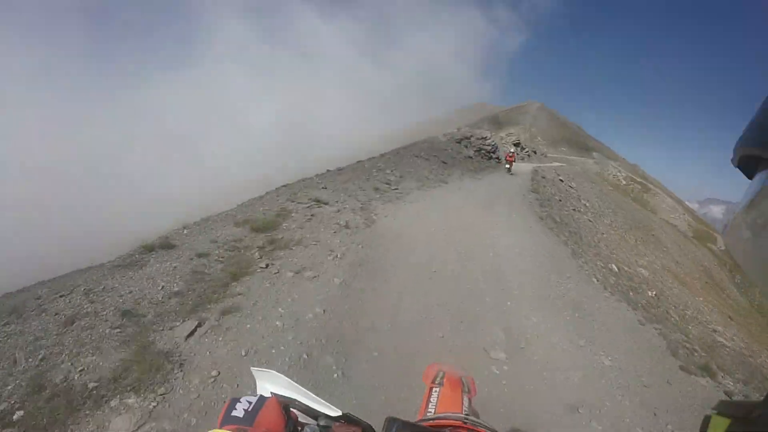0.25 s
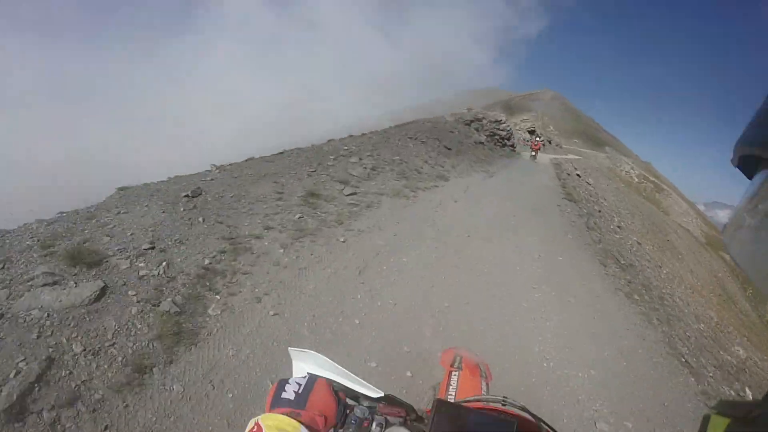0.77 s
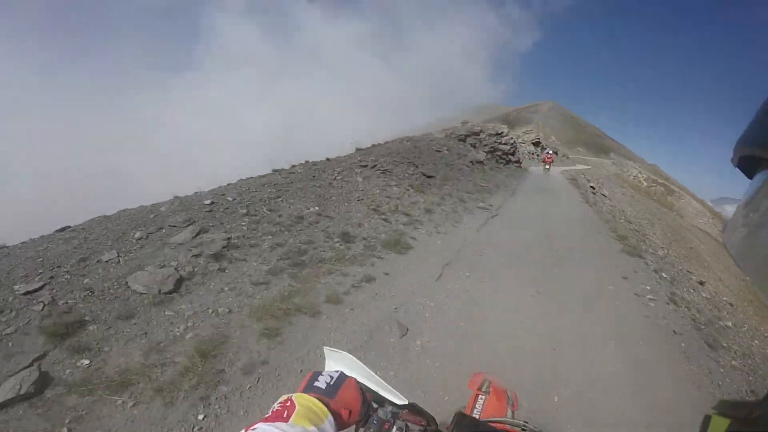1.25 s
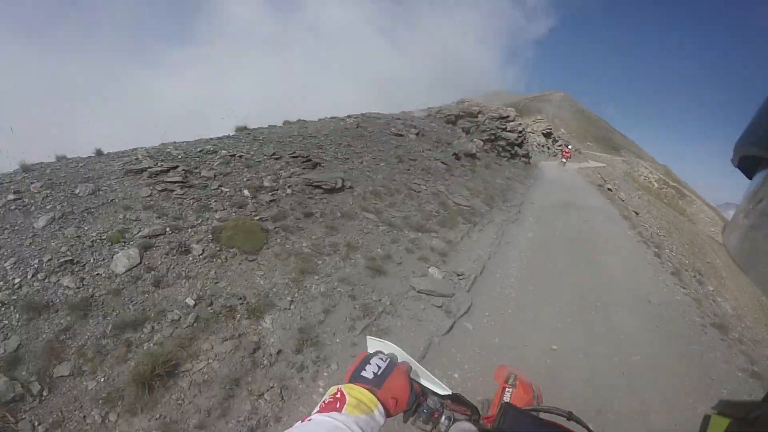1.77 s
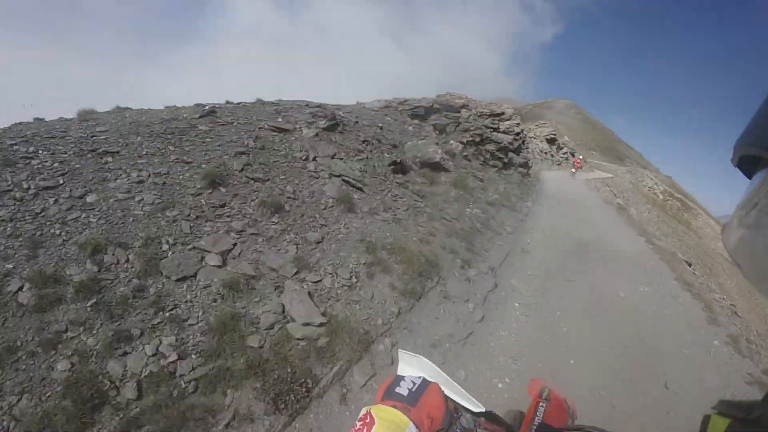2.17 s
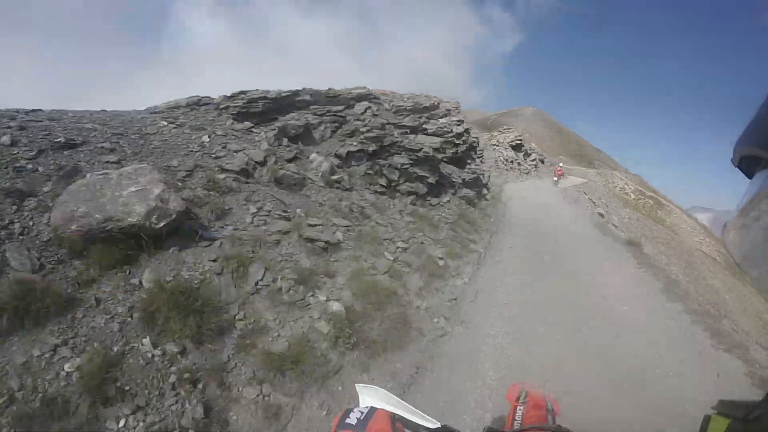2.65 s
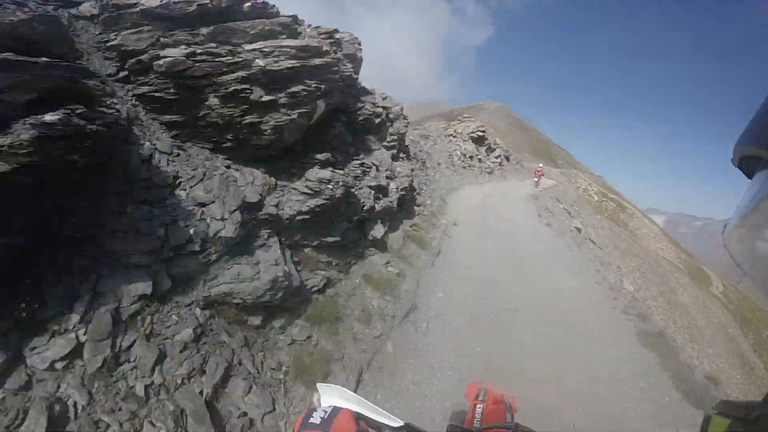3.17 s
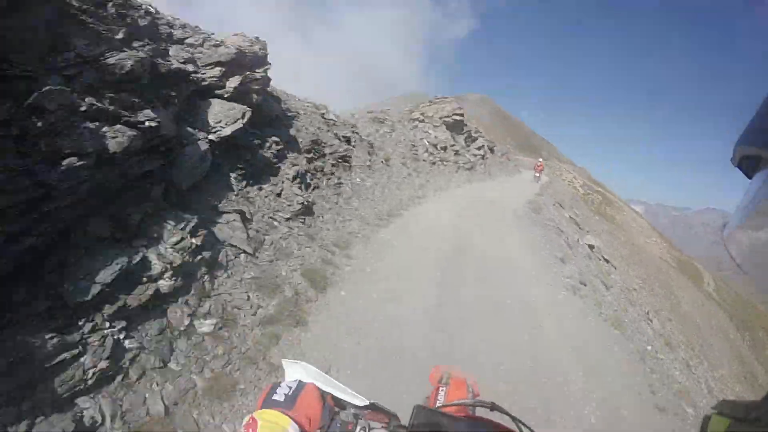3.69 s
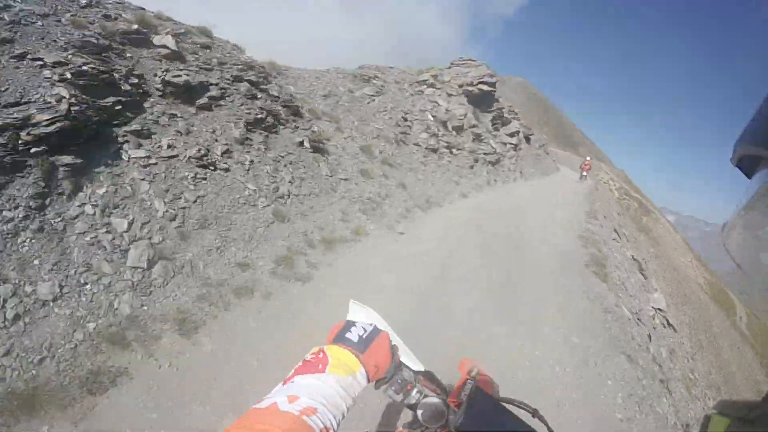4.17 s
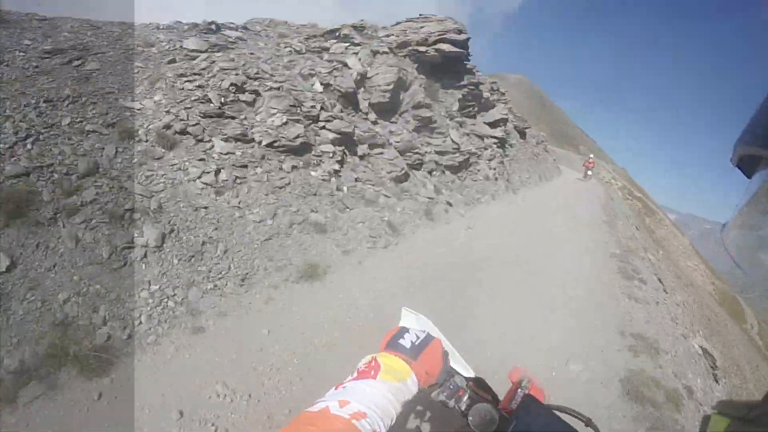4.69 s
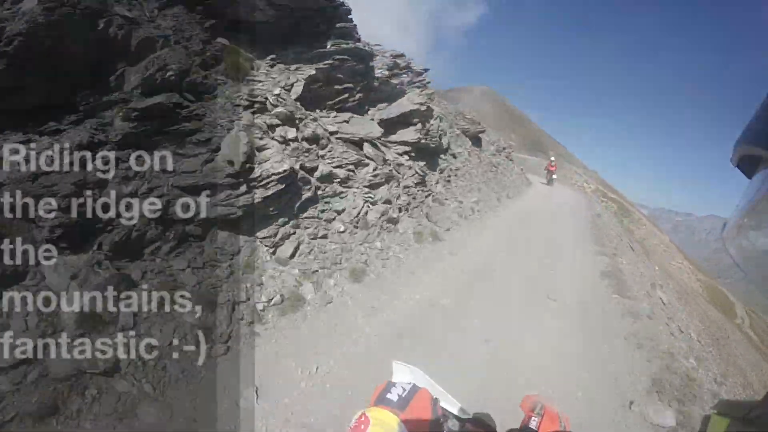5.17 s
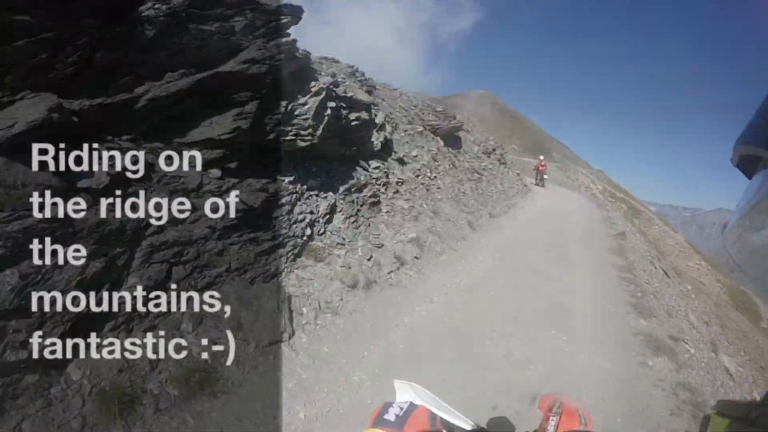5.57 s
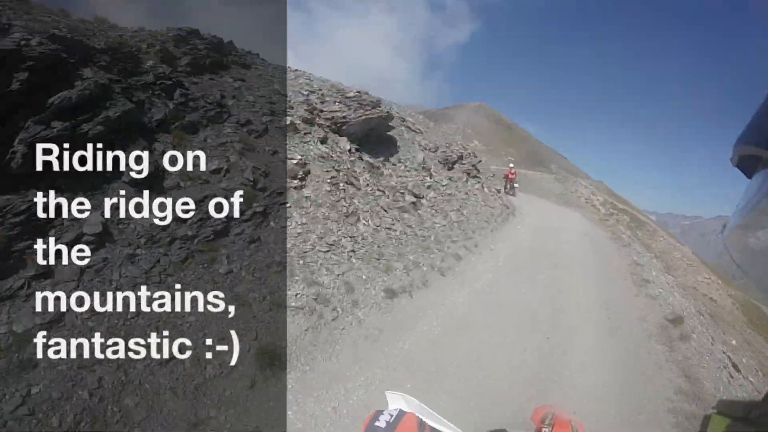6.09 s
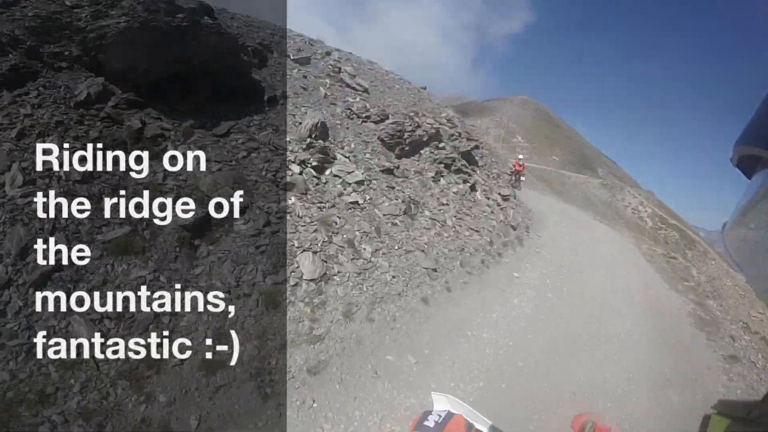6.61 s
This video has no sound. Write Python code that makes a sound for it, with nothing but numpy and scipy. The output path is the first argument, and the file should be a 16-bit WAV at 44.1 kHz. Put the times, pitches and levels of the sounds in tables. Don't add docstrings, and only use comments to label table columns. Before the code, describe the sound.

A single-cylinder dirt bike blares uphill at full throttle, cuts to a ragged burble, pulls hard again, then settles into soft thudding amid buffeting wind.

```python
import sys
import numpy as np
from scipy import signal
from scipy.fft import rfft, irfft, next_fast_len
from scipy.io import wavfile
from scipy.ndimage import uniform_filter1d, map_coordinates

SR = 44100
rng = np.random.default_rng(int(sys.argv[2]) if len(sys.argv) > 2 else 0)


def ratio(d):
    e = np.asarray(d, float) / 20
    return 10 ** e


def dump_mix(stems):
    frames = np.atleast_2d(stems).T
    limited = np.clip(frames, -1, 1)
    pcm = np.round(limited * 32767).astype(np.int16)
    wavfile.write(sys.argv[1], SR, pcm)


N = 302085

# (t/s, firing rate f/Hz)
SPEED = [(0.0, 39.73), (0.55, 46.74), (0.85, 53.58), (0.95, 50.97), (1.33, 56.7), (1.64, 57.6),
         (2.06, 43.07), (2.12, 42.66), (2.79, 46.65), (3.06, 47.37), (3.31, 49.55), (4.46, 38.21),
         (4.73, 41.51), (4.96, 38.47), (5.86, 37.77), (5.97, 38.94), (6.47, 36.45), (6.85, 37.37)]
# (t/s, throttle opening [0-1], steadiness of burning [0-1])
THROTTLE = [(0, .9, .98), (.8, .9, .98), (1.2, .85, .97), (1.58, .8, .96), (1.68, .1, .3), (2.0, .1, .3),
            (2.1, .5, .85), (2.3, .9, .975), (3.25, .9, .975), (3.45, .8, .9), (3.55, .1, .3),
            (4.3, .05, .3), (4.5, .05, .6), (4.85, .06, .97), (5.9, .06, .97), (6.85, .06, .95)]
# (intake pop t/s, exhaust blast t/s)
PULSE_TIMES_S = (-.0018, .0029)


def unit(x):
    return x / np.sqrt(np.mean(x ** 2) + 1e-20)


def curves(rows):
    s, *cols = np.transpose(rows)
    return [np.interp(np.arange(N) / SR, s, c) for c in cols]


def peak(at_s, rise_s, fall_s):
    return np.interp(np.arange(N) / SR, [at_s - abs(rise_s), at_s, at_s + abs(fall_s)], [0, 1, 0])


def wobble(rate):
    knots = rng.standard_normal(int(N * rate / SR) + 4)
    return map_coordinates(knots, [np.arange(N) * rate / SR])


def filtered(x, response):
    m = next_fast_len(N + SR // 2)
    return irfft(rfft(x, m) * response(np.fft.rfftfreq(m, 1 / SR)), m)[:N]


def low_pass(x, corner_hz, poles):
    return filtered(x, lambda hz: 1 / (1 + 1j * hz / corner_hz) ** poles)


def resonate(x, modes):
    def response(hz):
        total = 0
        for k, (centre, width, db) in enumerate(modes):
            band = 1j * hz * width
            sign = (-1) ** k
            total = total + sign * ratio(db) * band / (centre * centre - hz * hz + band)
        return total / (1 + 1j * hz / 6000) ** 4
    return unit(filtered(x, response))


def rush(spectrum, patchy_db):
    z = signal.stft(rng.standard_normal(N), nperseg=512)[2]
    field = uniform_filter1d(rng.standard_normal(z.shape), 5, 0)
    field = uniform_filter1d(field, 8, 1)
    noise = signal.istft(z * ratio(patchy_db * unit(field)), nperseg=512)[1][:N]
    f, db = np.transpose(spectrum)
    return unit(filtered(noise, lambda hz: ratio(np.interp(np.log(hz + 1), np.log(f), db))))


def crank():
    # (t/s, change of firing rate f/Hz)
    bumps = [(-0.02, 1.4), (0.1, -1.0), (0.2, 0.4), (0.28, -0.7), (0.38, 0.4), (0.48, -0.9), (0.64, 1.1),
             (0.72, -0.4), (0.86, -0.7), (1.04, 0.3), (1.12, 0.6), (1.26, -1.8), (1.34, 0.5), (1.5, -0.4),
             (1.58, -0.5), (1.66, 3.1), (1.9, .45), (2.36, -1.2), (2.6, -0.4), (2.86, -0.4), (3.28, -0.7),
             (3.5, 1.5), (4.66, -0.8), (4.8, -1.0), (4.88, -0.4), (4.98, 0.9), (5.16, 0.5), (5.42, -0.4),
             (5.54, 0.3), (5.72, 0.7), (6.04, -0.2), (6.14, -0.4), (6.22, -0.1), (6.3, -0.4), (6.44, 0.4)]
    half_width_s = .06
    swings_hz = sum(hz * peak(s, half_width_s, half_width_s) for s, hz in bumps)
    return np.cumsum(curves(SPEED)[0] + swings_hz) / SR + .42


def pulses(cycle, jitter_s, scatter_db, arrivals):
    at = np.flatnonzero(np.diff(np.floor(cycle)))
    chance = rng.standard_normal((400, 2 * len(arrivals)))[:len(at)]
    train = np.zeros(N + SR)
    for k, (delay, gain) in enumerate(arrivals):
        where = np.abs(at + SR * (delay + jitter_s * chance[:, 2 * k])).astype(int)
        np.add.at(train, where, gain * ratio(scatter_db * chance[:, 2 * k + 1]))
    return train[:N]


def gate(cycle, sharp, floor):
    return floor + uniform_filter1d(np.exp(-sharp * (cycle % 1)), size=60)


def puffs(cycle):
    return gate(cycle, sharp=8.9, floor=0.16) * rng.standard_normal(N)


def air_box_honk(cycle, firing_hz):
    gulp_s = PULSE_TIMES_S[1] - .0024
    late = np.clip((firing_hz - 47.5) / 4.5, 0, 1)
    gulp = (1 - late) * pulses(cycle, .00006, .7, [(gulp_s, -1)])
    gulp = gulp + late * pulses(cycle, .00006, .7, [(gulp_s + .0075, -1)])
    box = resonate(gulp, [(269.4, 39, 0)])
    return ratio(-2) * resonate(box, [(270, 75, 0)])


def silencer_thud(cycle):
    # (delay t/s, gain [1])
    pipe_echoes = [
        (.001, -1),
        (.0054, -.9),
        (.013, -.5),
    ]
    # (f/Hz, width/Hz, level/dB)
    silencer = [(144, 39, 0.5), (257, 72, 4.5), (81.3, 41, 2.5)]
    thud = resonate(pulses(cycle, .00012, 1, pipe_echoes), silencer)
    click = resonate(pulses(cycle, .00012, 2, [(0, 1)]), [(476, 490, 0)])
    return unit(low_pass(thud + ratio(1.4) * click, 700, 3))


def misfire_burble(cycle):
    # (f/Hz, level/dB per Hz)
    burble_colour = [(47, -50.5), (80, -28.5), (173, -10), (269, -7), (291, -6.5), (390, -11), (509, -12),
                     (846, -16.5), (1800, -43), (2340, -63), (3960, -120)]
    lumps = ratio(1.1 * wobble(35)) * gate(cycle, sharp=0.83, floor=1.0)
    return unit(lumps * rush(burble_colour, patchy_db=.6))


def header_bark(cycle):
    # (f/Hz, width/Hz, level/dB)
    header = [(547, 170, 4.2), (618, 73, 6.5), (676, 90, -9.5), (964, 160, -13)]
    direct, returned = PULSE_TIMES_S
    blasts = pulses(cycle, .00003, 1, [(direct + .0005, .55), (returned, 1), (returned + .007, .3)])
    bark = resonate(blasts, header) + .12 * resonate(puffs(cycle), header)
    return unit(low_pass(bark, 1500, 2))


def tail_pipe(cycle, firing_hz, throttle, steady):
    # (t/s, share [0-1])
    return_share = [(0, .2), (.5, .2), (.7, .35), (1.6, .3), (2.1, .9), (2.3, .7), (3.45, .6), (6.85, .6)]
    # (f/Hz, width/Hz, level/dB)
    tail_modes = [(1690, 243, 3.5), (2075, 1150, -2.5), (2930, 1040, -3.5)]
    # (f/Hz, width/Hz, level/dB)
    outlet = [(1720, 140, -3), (2110, 630, -11.5)]
    # (f/Hz, width/Hz, level/dB)
    rasp_modes = [(1150, 220, -16), (1340, 350, 1.5)]
    # (t/s, f/Hz)
    header_tone = [(0, 1026), (.35, 1070), (.47, 920), (.8, 980), (1.0, 987), (1.25, 1050), (1.6, 1070),
                   (2.1, 1060), (2.4, 960), (3.0, 940), (3.5, 960)]
    direct, returned = PULSE_TIMES_S
    first = pulses(cycle, .00002, 1.3, [(direct, 1)])
    second = pulses(cycle, .00002, 1.3, [(returned, 1)])
    back, = curves(return_share)
    first_gain, second_gain = np.sqrt(1 - back), np.sqrt(back)

    snap = first_gain * resonate(first, tail_modes) + second_gain * resonate(second, outlet)
    snap += .45 * resonate(puffs(cycle), tail_modes)
    snap_db = -19.5 + 2.5 * np.minimum(firing_hz - 45.5, 0)

    crack = first_gain * first + second_gain * second
    rasp = resonate(crack, rasp_modes) + .3 * resonate(puffs(cycle), rasp_modes)
    rasp_db = -15.5 - 2.5 * np.abs(firing_hz - 55.3)

    stops_hz = (880, 950, 1020, 1090)
    place = np.interp(curves(header_tone)[0], stops_hz, range(len(stops_hz)))
    tone = 0
    for k, hz in enumerate(stops_hz):
        tone = tone + np.clip(1 - abs(place - k), 0, 1) * resonate(second, [(hz, 70, 0)])

    out = ratio(snap_db) * throttle ** 0.71 * snap
    out += ratio(rasp_db) * throttle * rasp
    return out + ratio(-12) * throttle * steady * tone


def engine(cycle):
    # (t/s, level/dB)
    loudness = [(0, -13.5), (.55, -15.5), (.72, -15.5), (.88, -18.5), (1.0, -17), (1.25, -18.5),
                (1.56, -20), (1.75, -31), (2.04, -27.5), (2.3, -16.5), (2.55, -17), (2.8, -16.5),
                (3.1, -15), (3.4, -19.5), (3.56, -33.5), (3.62, -26.5), (3.7, -31), (3.8, -26.5),
                (4.42, -36.5), (4.75, -25.5), (5.4, -23.5), (6.1, -21.5), (6.85, -24)]
    level_db, = curves(loudness)
    firing_hz, = curves(SPEED)
    throttle, steady = curves(THROTTLE)
    honk = np.sqrt(throttle) * air_box_honk(cycle, firing_hz)
    thud = np.sqrt(1 - throttle) * silencer_thud(cycle)
    body = np.sqrt(steady) * (honk + thud)
    body += np.sqrt(1 - steady) * ratio(8.5) * misfire_burble(cycle)
    bark_db = -7 - 0.36 * np.maximum(firing_hz - 45.5, 0)
    bark = ratio(bark_db) * np.sqrt(steady) * throttle ** 0.39 * header_bark(cycle)
    return ratio(level_db) * (body + bark + tail_pipe(cycle, firing_hz, throttle, steady))


def drivetrain(cycle):
    # (t/s, level/dB)
    drive = [(0, -40.5), (.5, -43.5), (1.35, -41.5), (1.85, -49), (2.3, -42), (3.3, -42), (3.7, -46),
             (4.43, -47.5), (4.84, -42.5), (5.4, -42.5), (5.7, -40), (6.1, -39.5), (6.45, -41.5),
             (6.85, -45)]
    # (f/Hz, width/Hz, level/dB)
    chain_modes = [(1100, 220, -17.5), (1245, 11, 5), (1384, 58, -6), (1650, 81, -7.5), (1196, 420, -4)]
    # (f/Hz, width/Hz, level/dB)
    gear_modes = [(2735, 110, 0), (2630, 60, -4), (3440, 150, -9)]
    # (f/Hz, level/dB per Hz)
    hiss_colour = [(1200, -10), (1700, 1.5), (2300, -4), (3300, 0), (4300, -4), (5900, -6), (7000, -17.5),
                   (8500, -27.5), (9600, -26.5), (10800, -38), (12800, -37), (14000, -51), (15000, -99)]
    load_db, = curves(drive)
    mean_db = load_db.mean()
    throttle = curves(THROTTLE)[0]
    clatter = gate(2 * cycle, sharp=0.2, floor=0.84) * ratio(0.68 * wobble(40))

    chain = resonate(clatter * rng.standard_normal(N), chain_modes)
    chain_db = mean_db + 8.5 + 0.61 * (load_db - mean_db) - 2 * throttle

    gears = resonate(clatter * rng.standard_normal(N), gear_modes)
    gears_db = mean_db - 11 + 15.5 * peak(1.56, rise_s=.36, fall_s=.45)

    tick = .5 * (1 - throttle) * gate(cycle - .4, sharp=7.6, floor=0)
    swell = gate(cycle + 0.15, sharp=3.3, floor=1.0) + tick
    hiss = unit(clatter * swell * rush(hiss_colour, patchy_db=0.67))
    return ratio(chain_db) * chain + ratio(gears_db) * gears + ratio(load_db + 4) * hiss


def knocks():
    # (t/s, peak level/dB, thump level/dB)
    strikes = [
        (1.8467, -19, 0),
        (2.1126, -19, 1.5),
        (6.612, -28, 12),
        (6.666, -34, 24),
        (6.678, -22, 3),
    ]
    out, t = np.zeros(N + SR), np.arange(SR // 10) / SR
    for s, db, thump_db in strikes:
        crack = ratio(-60 * t / 0.014) * rng.standard_normal(len(t))
        thump = ratio(thump_db + 6.5 - 60 * t / 0.045) * np.sin(2 * np.pi * 170 * t)
        out[round(s * SR):][:len(t)] += ratio(db) * (2.5 * crack + thump)
    return low_pass(out[:N], 5500, 6)


def wind():
    # (t/s, level/dB)
    strength = [(0, -34), (2, -33.5), (3.2, -31.5), (4.4, -33), (5.5, -29.5), (6.85, -25.5)]
    # (t/s, level/dB)
    gusts = [(0.581, 8.5), (0.738, 12.5), (0.931, 4), (1.501, 13.5), (2.4, 4), (2.558, 6), (2.8, 8),
             (3.75, 8), (4.19, 7), (4.28, 4.5), (5.142, 10), (5.95, 3), (6.4, 2.5)]
    # (f/Hz, level/dB per Hz)
    buffet_colour = [(15, -39.5), (30, -22), (60, -6.5), (110, 6), (200, -1), (320, -3.5), (500, -30),
                     (900, -58.5), (2500, -120)]
    # (f/Hz, level/dB per Hz)
    rumble_colour = [(15, -12), (30, -9.5), (55, 3.5), (90, -4), (200, -62), (400, -120)]
    # (f/Hz, level/dB per Hz)
    air_colour = [(1800, -32.5), (3000, -3.5), (5000, -1.5), (7500, -20.5), (10000, -24.5), (13000, -27),
                  (15000, -58)]
    gust_s = 0.084
    wind_db, = curves(strength)
    swing_db = wind_db - wind_db.mean()
    buffet_db = wind_db + 2.4 + sum(db * peak(s, gust_s, gust_s) for s, db in gusts)
    buffet = unit(ratio(1.5 * wobble(14)) * rush(buffet_colour, patchy_db=.5))
    rumble = ratio(-38.5 + 1.7 * swing_db) * rush(rumble_colour, patchy_db=3.7)
    air = ratio(-52.5 + 1.1 * swing_db) * rush(air_colour, patchy_db=1.0)
    return ratio(buffet_db) * buffet + rumble + air


def scene():
    cycle = crank()
    return (engine(cycle) + drivetrain(cycle) + knocks() + wind())[None]


def band_limit(x):
    return signal.sosfilt(signal.butter(12, 15000, fs=SR, output="sos"), x)


def record(dry):
    return band_limit(dry)


dry = scene()
out = record(dry)
dump_mix(out)
```